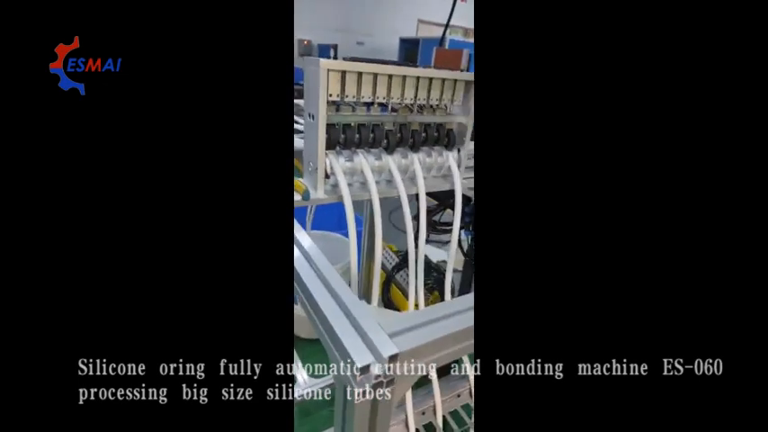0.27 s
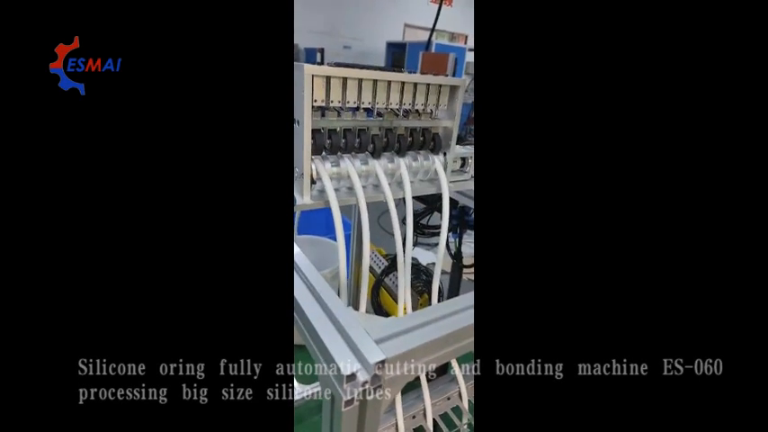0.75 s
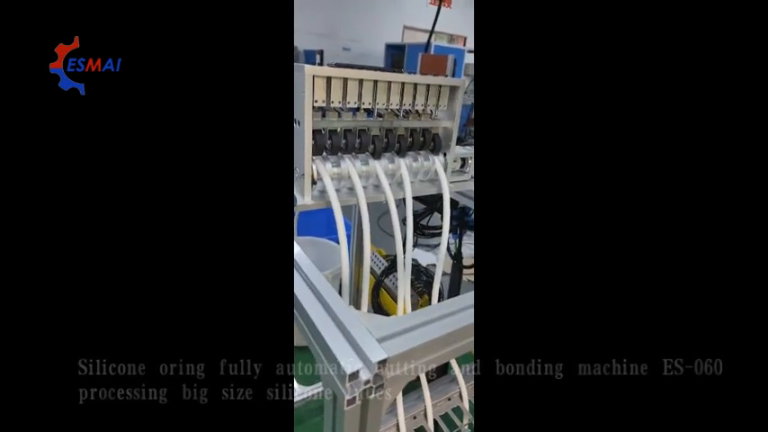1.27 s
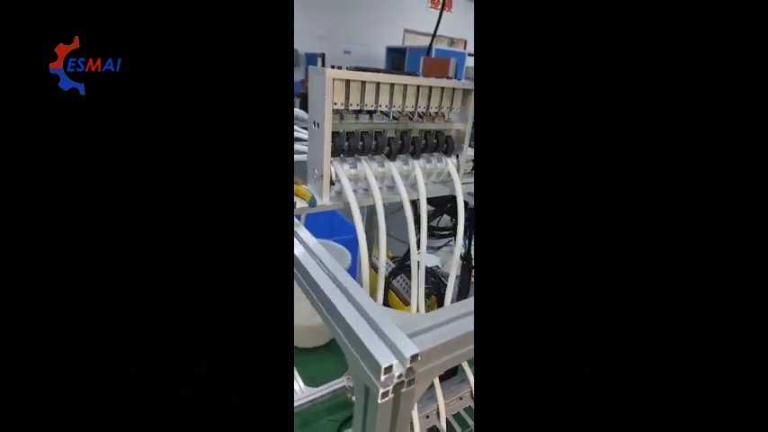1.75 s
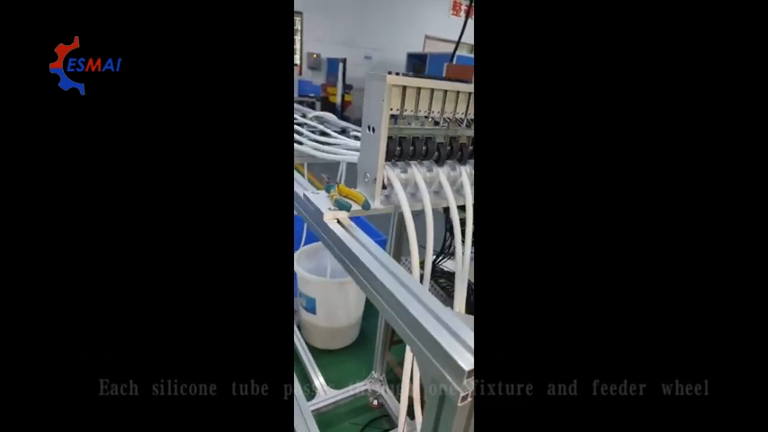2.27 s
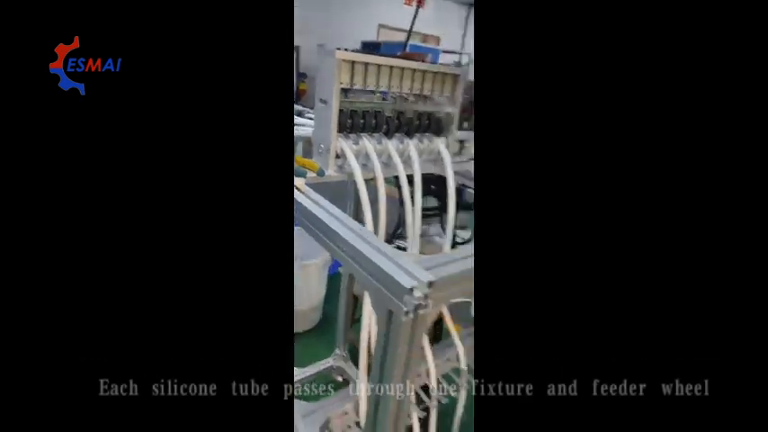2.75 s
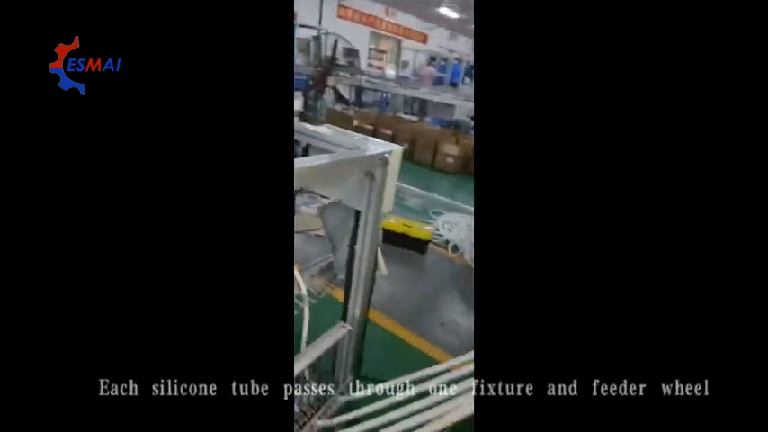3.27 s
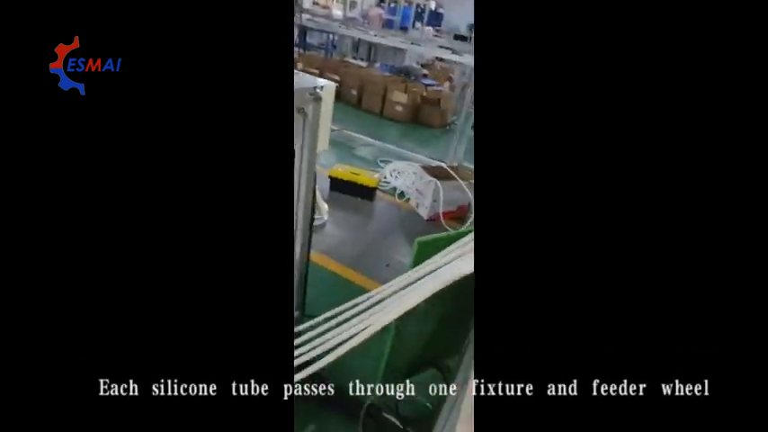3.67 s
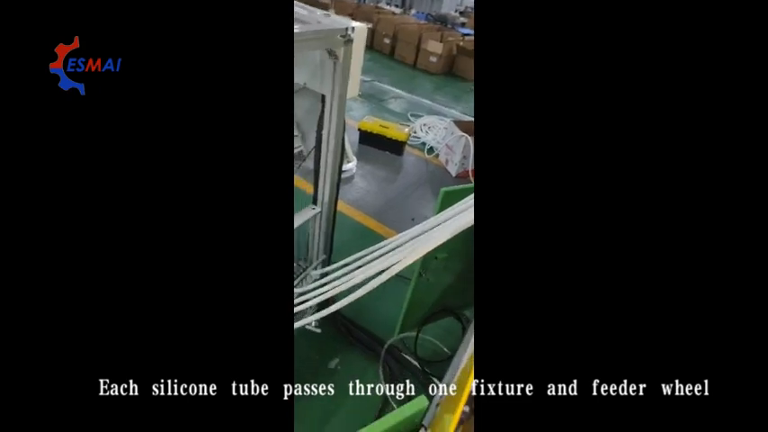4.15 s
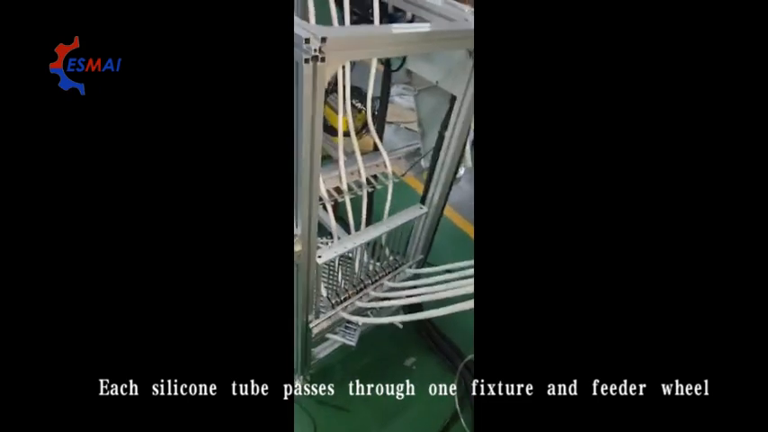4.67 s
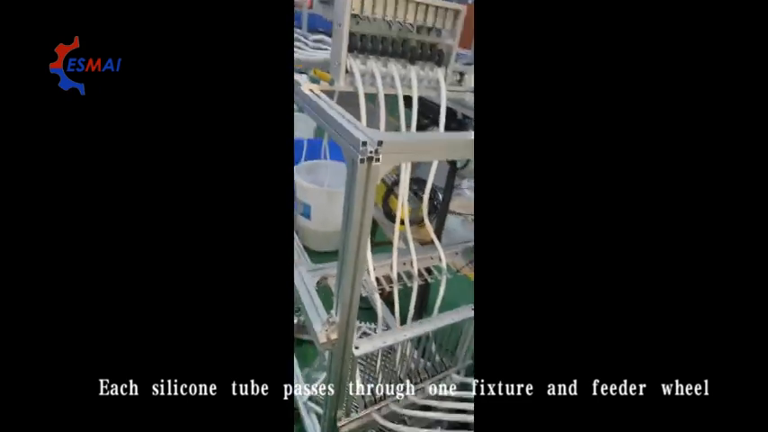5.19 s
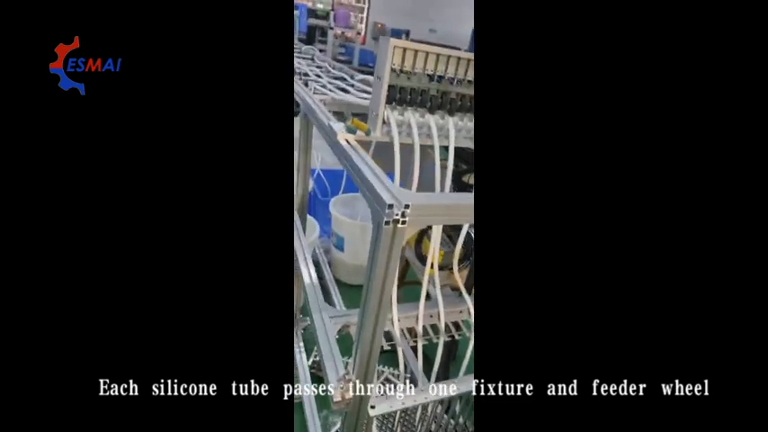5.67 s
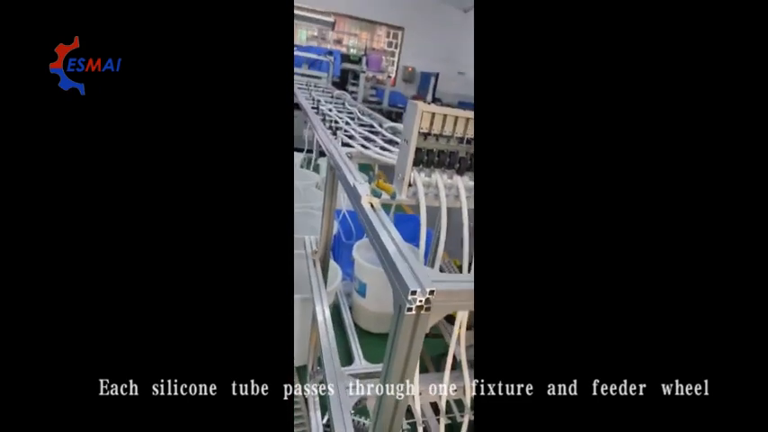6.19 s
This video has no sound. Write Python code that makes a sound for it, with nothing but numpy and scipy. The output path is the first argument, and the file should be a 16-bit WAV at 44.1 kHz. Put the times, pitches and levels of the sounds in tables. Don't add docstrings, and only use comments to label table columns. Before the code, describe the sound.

An automatic pneumatic machine heard by a near microphone in an echoing factory hall. Hiss, a pause, another hiss, then a hard valve snap; more snaps come singly and in pairs, trailed by airy, pitched exhaust. A quick run of clacks and jets leads to a heavy slam with a muffled air dump, and renewed hissing closes. Low motor hum, carriage rumble and a faint piercing whine continue beneath.

```python
import sys
import numpy as np
from scipy import signal
from scipy.io import wavfile
from scipy.ndimage import uniform_filter1d

SR = 44100
rng = np.random.default_rng(int(sys.argv[2]) if len(sys.argv) > 2 else 0)


def put_to_file(sound):
    columns = np.atleast_2d(sound).T
    safe = np.clip(columns, -1, 1)
    whole_steps = np.round(safe * 32767)
    wavfile.write(sys.argv[1], SR, whole_steps.astype(np.int16))


def invert_db(x):
    u = np.asarray(x, float) / 20
    return 10 ** u


N = 283546
TIME = np.arange(N) / SR
COARSE = np.arange(0, N + 64, 64)


def rms_one(x):
    return x / np.sqrt(np.mean(x ** 2) + 1e-20)


def fine(slow):
    return np.interp(np.arange(N), COARSE, slow)


def in_time(rows):
    s, level = np.transpose(rows)
    return np.interp(COARSE / SR, s, level)


def drift(rate_hz):
    r = np.exp(-128 * np.pi * rate_hz / SR)
    settle = 1500
    white = rng.standard_normal(len(COARSE) + settle)
    return rms_one(signal.lfilter([1], [1, -2 * r, r * r], white)[settle:])


def strokes(start, end, rise_db_per_s, fall_db_per_s):
    s = COARSE / SR
    climb = np.maximum(start[:, None] - s, 0) * rise_db_per_s
    fall = np.maximum(s - end[:, None], 0) * fall_db_per_s
    return -climb - fall


def dying(s, t60, rise_s):
    out, start = np.zeros(N), round(s * SR)
    age = TIME[:min(N - start, round(t60 * SR))]
    out[start:start + len(age)] = (1 - np.exp(-age / rise_s)) * invert_db(-60 * age / t60)
    return out


def ring(x, modes):
    out = 0
    for hz, db, t60 in modes:
        r, w = invert_db(-60 / (t60 * SR)), 2 * np.pi * hz / SR
        poles = [1, -2 * r * np.cos(w), r * r]
        out = out + invert_db(db) * signal.lfilter([0, np.sin(w)], poles, x + 1e-18)
    return out


def resonance(x, hz, width_hz):
    r = np.exp(-np.pi * width_hz / SR)
    poles = [1, -2 * r * np.cos(2 * np.pi * hz / SR), r * r]
    return signal.lfilter([(1 - r * r) / 2, 0, (r * r - 1) / 2], poles, x)


def sung(peaks):
    air = rng.standard_normal(N)
    return rms_one(sum(invert_db(db) * resonance(air, hz, width) for hz, width, db in peaks))


def turbulence(spectrum, patchy_db, rate_hz, db=0, low_db=0, knee_hz=4000):
    hz, shape_db = np.transpose(spectrum)
    thirds = np.arange(3 * np.log2(hz[-1] / hz[0]) + 1)
    edges = hz[0] * 2 ** (thirds / 3)
    white = rng.standard_normal((2, N))
    together = drift(rate_hz / 3)
    out, power = 0, 0
    for k, (low, high) in enumerate(zip(edges, edges[1:])):
        band_filter = signal.butter(2, [low, high], "band", fs=SR, output="sos")
        band = signal.sosfilt(band_filter, white[k % 2])
        centre = np.sqrt(low * high)
        level_db = np.interp(np.log(centre), np.log(hz), shape_db)
        power += invert_db(2 * level_db) * (high - low) * 2.2 / SR
        share = 1 / (1 + (centre / knee_hz) ** 2)
        flicker_db = patchy_db * (0.5 * together + drift(rate_hz))
        out = out + fine(invert_db(db + level_db + flicker_db + share * low_db)) * band
    return out / np.sqrt(power)


def nozzles():
    # fully open in seconds, shuts in seconds, opening time in seconds, jet level in dB,
    # fullness of the lower half in dB.
    bursts = [(0.0, 0.255, .05, -24.5, -1), (0.635, 0.733, .16, -24.5, 0), (3.332, 3.332, .02, -58, 5),
              (3.407, 3.46, .05, -47, 20), (3.462, 3.645, 0.0085, -30, 4), (3.67, 3.69, 0.23, -27, 1),
              (3.87, 3.902, 0.21, -24.5, 3.5), (3.946, 3.96, .05, -29.5, -10.5),
              (4.165, 4.217, 0.15, -29.5, -1), (4.958, 4.958, 0.055, -34.5, 4),
              (5.078, 5.076, 0.15, -36.5, 6), (5.164, 5.247, .01, -28.5, 11),
              (5.324, 5.416, 0.17, -26.5, 16.5), (5.475, 5.572, .1, -28.5, 9), (5.989, 6.084, 0.2, -25, -5),
              (6.298, 6.43, 0.35, -24.5, -0.5)]
    # frequency in Hz, level in dB per Hz.
    jet = [(290, -51), (500, -14), (662, -30), (762, -18.5), (1010, -18), (1140, -19.5), (1920, -13),
           (2410, -7), (3420, -6.5), (3720, -8), (6610, 0.5), (9930, -8.5), (13500, -5), (14300, 6)]
    opening_db, bleed_db_per_s = 21, 86.5
    lows_linger = 0.59
    full, shut, opening_s, db, low_db = np.transpose(bursts)
    stroke_db = strokes(full, shut, opening_db / opening_s[:, None], bleed_db_per_s)
    jets = invert_db(2 * (db[:, None] + stroke_db)) + 1e-20
    bleed_db = strokes(full, shut, 0, bleed_db_per_s)
    lows = low_db[:, None] + np.minimum(-lows_linger * bleed_db, 14)
    total = jets.sum(axis=0)
    fullness_db = (jets * lows).sum(axis=0) / total
    return turbulence(jet, 1.0, 15, db=10 * np.log10(total), low_db=fullness_db, knee_hz=3400)


def hall_sounds():
    # up to speed in seconds, stops in seconds, rumble in dB, hum in dB.
    moves = [(0.604, 0.705, -38, -48), (0.92, 1.125, -43.5, -39), (1.206, 1.23, -47, -38),
             (1.493, 1.51, -48.5, -35.5), (1.606, 1.647, -37, -42), (1.946, 2.005, -52, -36),
             (2.447, 2.44, -42, -36), (2.544, 2.597, -39, -36.5), (2.767, 2.85, -41.5, -41),
             (3.048, 3.095, -52, -38), (3.65, 3.657, -40, -43), (3.877, 3.91, -41, -41),
             (4.166, 4.25, -42, -44), (4.44, 4.447, -43, -43), (4.905, 4.93, -37.5, -38),
             (5.214, 5.38, -38, -39), (5.464, 5.666, -37.5, -37), (5.75, 5.807, -42.5, -41),
             (6.305, 6.333, -47.5, -37.5)]
    # frequency in Hz, level in dB per Hz.
    rumble_colour = [(76, -19), (130, 2), (401, -3.5), (550, -8.5), (703, -13), (918, -10), (1160, -17.5),
                     (1500, -15), (1950, -47), (3300, -120)]
    hum_colour = [(12, -42), (20, -14.5), (59, 1.5), (76, -1), (96, -5.5), (119, -3.5), (150, -17.5),
                  (200, -8.5), (260, -33), (440, -120)]
    far_colour = [(290, -24), (500, -0.5), (1160, -12), (3520, -7.5), (4220, -12.5), (7500, -8), (7930, -2),
                  (8270, -20.5), (8750, -43), (10700, -30), (12600, -16.5), (14300, -19)]
    # time in seconds, level in dB.
    load = [(0, -54), (1.05, -51), (1.4, -56), (1.55, -57), (1.85, -53), (2.1, -58), (2.5, -53), (3.3, -55),
            (3.9, -46), (4.1, -45), (4.44, -48), (4.5, -54), (4.58, -46), (4.84, -45), (4.95, -56),
            (6.43, -51)]
    # time in seconds, level in dB.
    bustle = [
        (0, -1),
        (1.3, 1),
        (1.8, 1),
        (2.08, 4.5),
        (2.45, 0.5),
        (2.9, -1),
        (3.2, -3),
        (4.5, 4.5),
        (6.43, 2),
    ]
    far_db, idle_rumble_db, idle_hum_db = -55, -50.5, -41.5
    start_db_per_s, coast_db_per_s = 119, 72
    start, end, rumble_db, hum_db = np.transpose(moves)
    shape_db = strokes(start, end, start_db_per_s, coast_db_per_s)
    rumble_db = np.maximum((rumble_db[:, None] + shape_db).max(axis=0), idle_rumble_db)
    hum_db = np.maximum((hum_db[:, None] + shape_db).max(axis=0), idle_hum_db)
    whine_level = fine(invert_db(in_time(load) + 4.1 * drift(22)))
    whine = whine_level * np.sin(2 * np.pi * 8005 * TIME + fine(1.1 * drift(8.0)))
    rumble = turbulence(rumble_colour, 1.76, 12.0, db=rumble_db)
    hum = turbulence(hum_colour, 0.75, 3.5, db=hum_db)
    far_hiss = turbulence(far_colour, 0.68, 9.8, db=far_db + in_time(bustle))
    return rumble + hum + whine + far_hiss


def squeaks():
    # start in seconds, length in seconds, frequency in Hz, width in Hz, level in dB.
    held_sounds = [(1.424, .056, 4610, 210, -46.5), (.961, .141, 1381, 19, -49), (1.331, .061, 2905, 41, -57),
                   (1.171, .041, 1382, 42, -55.5), (3.421, .043, 1705, 105, -41), (3.981, .015, 1755, 155, -36),
                   (1.7, .039, 1910, 1810, -41.5), (2.431, .036, 2800, 1510, -44.5), (1.101, .121, 580, 200, -47),
                   (4.101, .221, 593, 130, -45), (2.741, .161, 410, 170, -45), (3.001, .071, 107, 16, -37),
                   (4.901, .08, 5010, 140, -41), (1.951, .451, 2000, 2600, -53), (5.171, .49, 840, 505, -38.5),
                   (.551, .271, 285, 202, -39)]
    air, out = rng.standard_normal(SR), np.zeros(N)
    for s, length, hz, width, db in held_sounds:
        start, count = round(s * SR), round(length * SR)
        held = resonance(resonance(air, hz, width), hz, width)[-count:]
        out[start:start + count] += invert_db(db) * np.hanning(count) * rms_one(held)
    return out


def valves():
    # snap in seconds, peak in dB, housing knock in dB, vented puff in dB,
    # lean to the plunger's deep modes in dB.
    snaps = [(0.8618, -4, -19.5, -24.5, -0.5), (1.5613, -5, -18, -20, 0.5), (1.6584, -6.5, -24, -20, -5),
             (2.464, -10, -42, -14, 0), (2.5603, -4, -30, -24, -1.5), (2.831, -34, -21, -31, 5),
             (3.462, -8.5, -10.5, -21, 3), (3.6635, -10, -20, -15, 3), (3.8623, -10, -36, -17, 3),
             (4.4627, -10.5, -21, -18, 6), (5.1606, -13.5, -8, -17.5, 1.5)]
    # frequency in Hz, level in dB, t60 in seconds.
    valve_modes = [(2600, -34, 0.026), (3026, -9, 0.042), (3278, -.5, 0.021), (3518, -1.5, 0.025),
                   (4130, -4.5, .015), (5065, -4.5, 0.029), (5230, -5, 0.026), (6330, -10.5, 0.018),
                   (6900, -9, 0.024), (8000, -3, 0.02), (8920, -9, 0.015), (11250, -2.5, 0.0069),
                   (12900, -1.5, 0.0097)]
    housing_modes = [(903, -0.5, 0.1), (959, 0.5, 0.09)]
    # frequency in Hz, level in dB per Hz.
    puff_colour = [(240, -30), (400, -18), (1430, -6), (1790, 0.5), (2200, -6.5), (3020, 1), (4650, -5.5),
                   (5090, -3), (6770, -3.5), (9690, -12.5), (10400, -21.5), (14300, -12)]
    chatter_t60_s, puff_t60_s = 0.019, 0.64
    bounce_s, bounce_db = .0105, -10.5
    grit = rng.standard_normal(N) * invert_db(1.23 * rng.exponential(1, N)) * (rng.random(N) < 9000 / SR)
    deep = np.array(valve_modes)[:, 0] < 3800
    chance_db = 1.1 * rng.standard_normal((len(snaps), len(valve_modes)))
    luck = invert_db(chance_db + np.array(snaps)[:, -1:] * deep)
    chatter, knock, puff = [], np.zeros(N), np.zeros(N)
    for s, db, knock_db, puff_db, lean_db in snaps:
        landing = invert_db(db) * dying(s - .001, chatter_t60_s, .0012)
        bounce = invert_db(db + bounce_db + lean_db) * dying(s + bounce_s, .022, .0008)
        chatter.append(landing + bounce)
        knock[round((s + .002) * SR)] = invert_db(db + knock_db)
        puff += invert_db(db + puff_db) * dying(s, puff_t60_s, 0.0053)
    hiss = turbulence(puff_colour, 1.6, 34)
    metal = sum(ring(blow * grit, [mode]) for blow, mode in zip(luck.T @ chatter, valve_modes))
    clack = invert_db(-18.5) * metal + invert_db(-9.0) * sum(chatter) * hiss
    return clack + invert_db(-5.0) * ring(knock, housing_modes), puff * hiss


def pipes():
    # start in seconds, long pipe in dB, short pipe in dB, fall in dB per second,
    # port shuts in seconds.
    singing = [
        (.865, -50.5, -31, -100, 0.98),
        (1.565, -49, -43, -90, 1.3),
        (1.662, -36, -50, -62, 1.87),
        (2.466, -32, -49, -42, 2.63),
        (2.565, -32, -48, -60, 2.83),
        (3.465, -49, -39, -55, 3.9),
        (3.666, -31.5, -45, -77, 3.8),
        (3.866, -31, -37, -34, 3.96),
        (4.465, -30, -31.5, -66, 4.68),
    ]
    # frequency in Hz, width in Hz, level in dB.
    long_pipe = [(1690, 130, 1), (1747, 150, 2.5), (2140, 600, -5.5)]
    short_pipe = [(3270, 130, 4), (3640, 100, -8.5)]
    long, short = np.zeros((2, N))
    for s, long_db, short_db, fall_db, shut in singing:
        closing = invert_db(-200 * np.maximum(TIME - shut, 0))
        flow = dying(s, -60 / min(fall_db, -20), 0.0067) * closing
        long += invert_db(long_db) * flow
        short += invert_db(short_db) * flow
    return long * sung(long_pipe) + short * sung(short_pipe)


def thuds():
    # time in seconds, peak in dB.
    hits = [
        (4.872, -15.5),
        (4.881, -20),
        (2.436, -29),
        (1.537, -31),
        (5.455, -23),
        (6.2, -32.5),
    ]
    # frequency in Hz, level in dB, t60 in seconds.
    frame_modes = [(105.5, -0.5, 0.19), (126, -5, .15), (218, -10.5, 0.13)]
    blows = np.zeros(N)
    for s, db in hits:
        blows[round(s * SR)] = invert_db(db)
    return ring(blows, frame_modes) * invert_db(-3)


def dump():
    blast = (4.871, -15.3, 0.03, 0.33)
    # frequency in Hz, level in dB per Hz.
    blast_colour = [(410, -54), (700, -27), (825, -13), (912, -11), (1020, -8), (2070, -18), (2570, -5),
                    (3180, -7.5), (3480, -4.5), (4370, -7), (4590, -10.5), (4950, -2), (9790, -10),
                    (13100, -8), (14300, -9)]
    # frequency in Hz, width in Hz, level in dB.
    muffler = [(2640, 150, -1.5), (3510, 73, 2), (4300, 80, -5), (5020, 120, 1), (5880, 300, -4)]
    s, db, rise_s, t60 = blast
    air = turbulence(blast_colour, 1.9, 45) + invert_db(-4) * sung(muffler)
    return invert_db(db) * dying(s, t60, rise_s) * air


def workshop(x):
    room_t60_s, build_up_s = 0.77, 0.013
    age = TIME[:SR]
    echo = rng.standard_normal(SR) * invert_db(-60 * age / room_t60_s) * np.clip(age / build_up_s, 0, 1)
    echo = signal.lfilter([1], [1, -.3], echo)
    return signal.fftconvolve(x, echo / np.sqrt(np.sum(echo ** 2)))[:N]


def scene():
    clacks, puffs = valves()
    near = clacks + thuds()
    air = puffs + pipes() + dump() + nozzles()
    mono = near + invert_db(-13.5) * workshop(near) + air + squeaks() + hall_sounds()
    return np.array([mono, mono])


def masking_gate(x, mask_db, high_mask_db, quiet_db, zero_db):
    hz, _, frames = signal.stft(x, SR, nperseg=1024)
    lines = np.abs(frames) ** 2
    power = uniform_filter1d(uniform_filter1d(lines, size=3, axis=0), size=4, axis=1)[1::3, 1::2]
    level = 10 * np.log10(power + 1e-20)
    around = uniform_filter1d(level, size=15, axis=0)
    band_hz = hz[1::3, None]
    margin = np.where(band_hz > 8300, high_mask_db, mask_db - 2 * (band_hz > 5200))
    masked = (band_hz > 2000) & (level < around + margin)
    faint = (band_hz > 8300) & (level < quiet_db)
    keep = np.repeat(np.repeat(~(masked | faint), 3, axis=0), 2, axis=1)
    keep = np.pad(keep, [(0, 3), (0, 2)], mode="edge")[:len(hz), :frames.shape[1]]
    keep = keep & (hz[:, None] < 14200)
    treble = np.log10(lines[hz > 1000].sum(axis=0) + 1e-20)
    steady = np.abs(np.gradient(treble)) < .2
    weak = lines < invert_db(2 * zero_db) * uniform_filter1d(lines, size=15, axis=0)
    weak = weak & steady & (hz[:, None] > 900)
    return signal.istft(frames * (keep & ~weak), SR, nperseg=1024)[1][:N]


def split_bands(x):
    # centre in seconds, low edge in Hz,
    # high edge in Hz, level in dB.
    splits = [
        (.072, 7500, 9000, 1),
        (.72, 6300, 7700, 3),
        (.72, 8200, 9700, 0),
        (.72, 11600, 13300, 0),
        (.952, 11000, 12500, 1),
        (3.787, 6900, 9000, 1),
        (3.787, 9600, 11200, 0),
        (4.228, 8200, 11200, 1),
        (5.575, 5600, 7000, 0),
    ]
    side = np.zeros(N)
    for s, low_hz, high_hz, db in splits:
        frame = slice(round(s * SR) - 1024, round(s * SR) + 1024)
        band_filter = signal.butter(10, [low_hz, high_hz], "band", fs=SR, output="sos")
        band = signal.sosfilt(band_filter, x[frame][::-1])
        side[frame] += invert_db(db - 1.5) * np.hanning(2048) ** 2 * band
    return side


def low_pass(x):
    return signal.sosfilt(signal.butter(12, 15280, fs=SR, output="sos"), x)


def record(dry):
    rounded = .75 * np.tanh(dry[0] / .75)
    thin = masking_gate(rounded, mask_db=-2.6, high_mask_db=-1.5, quiet_db=-93.5, zero_db=-3.5)
    mix = thin + split_bands(thin) * [[1], [-1]]
    return low_pass(mix)


dry = scene()
out = record(dry)
put_to_file(out)
```